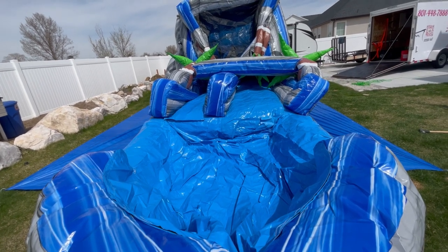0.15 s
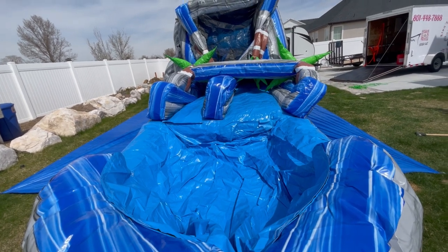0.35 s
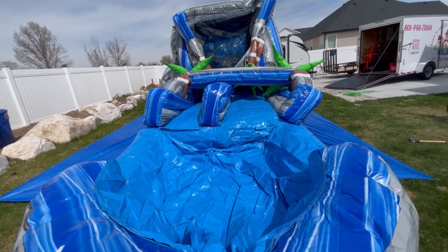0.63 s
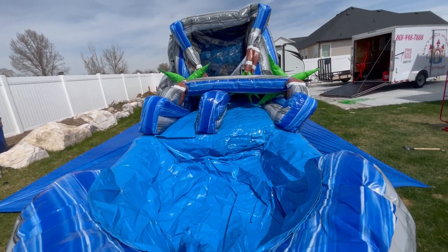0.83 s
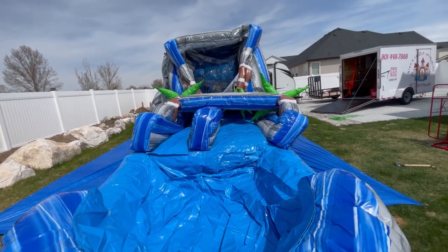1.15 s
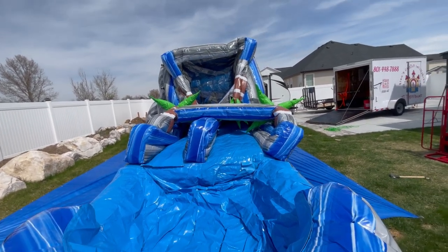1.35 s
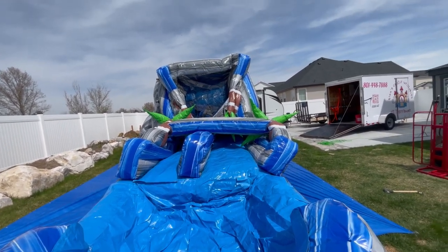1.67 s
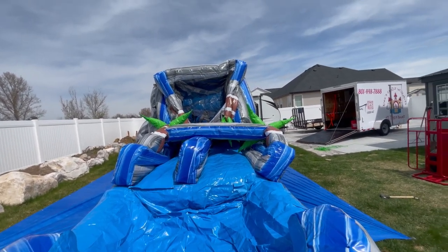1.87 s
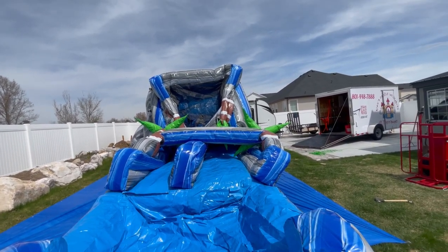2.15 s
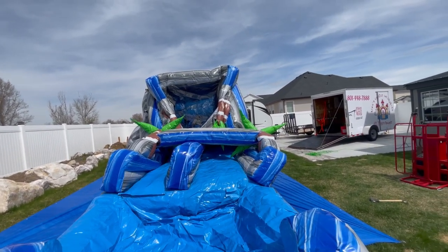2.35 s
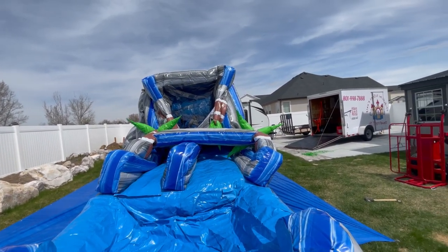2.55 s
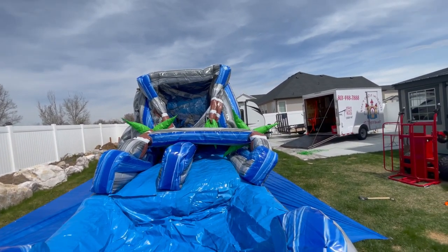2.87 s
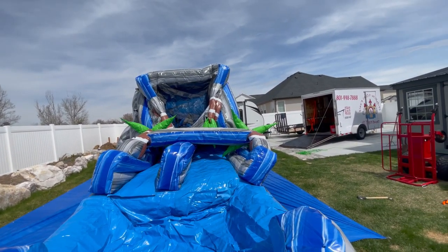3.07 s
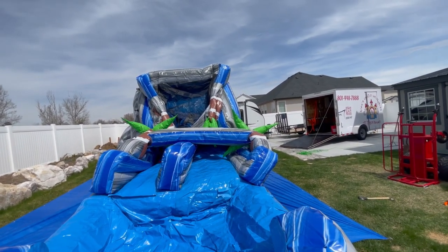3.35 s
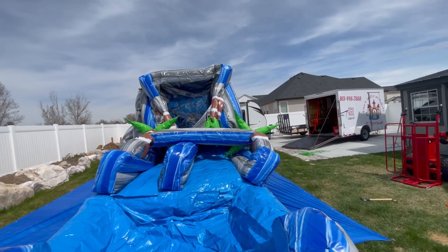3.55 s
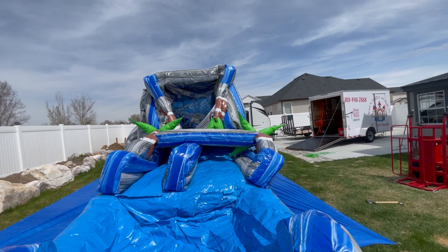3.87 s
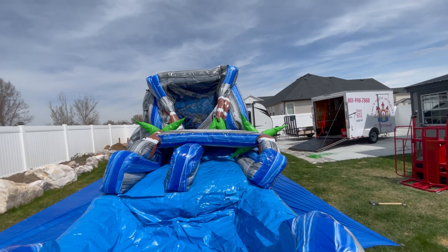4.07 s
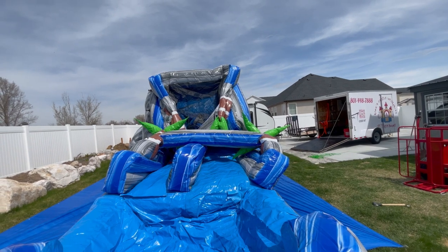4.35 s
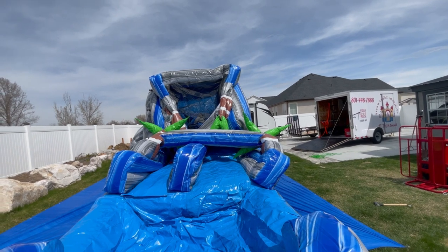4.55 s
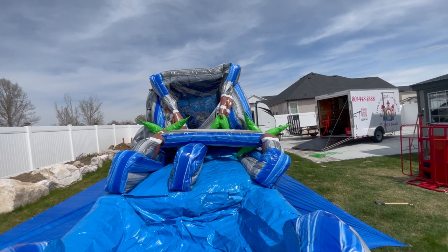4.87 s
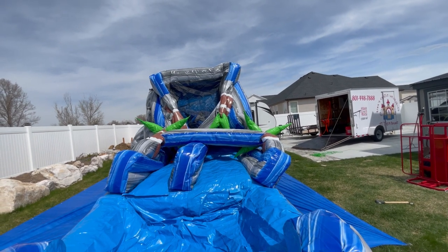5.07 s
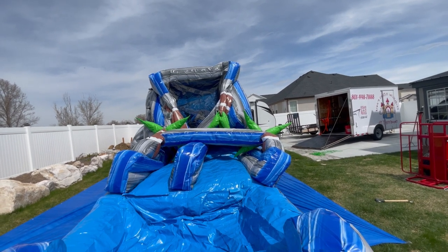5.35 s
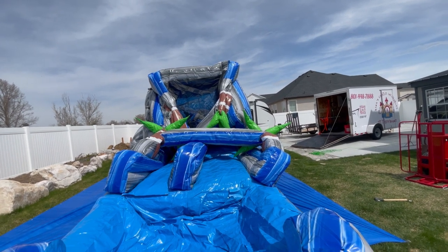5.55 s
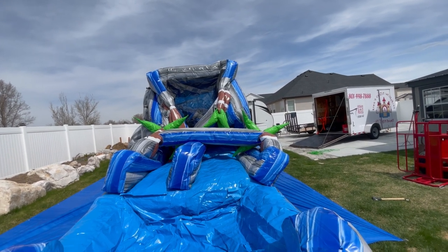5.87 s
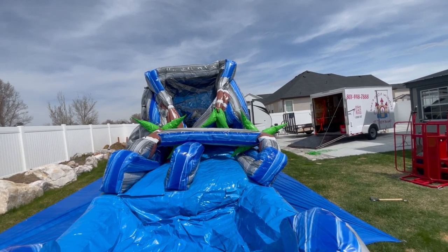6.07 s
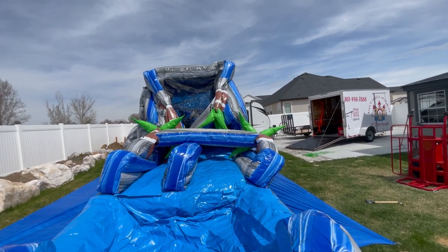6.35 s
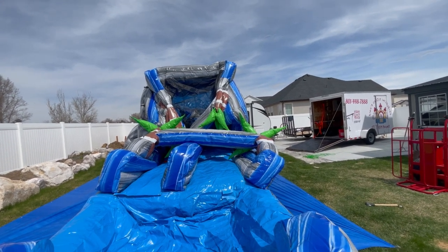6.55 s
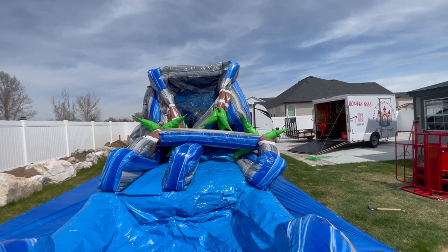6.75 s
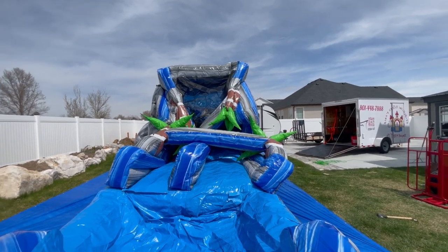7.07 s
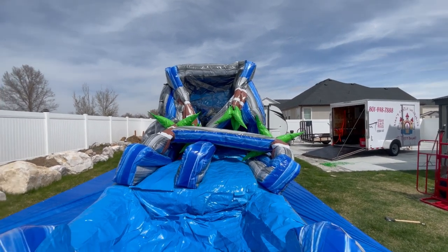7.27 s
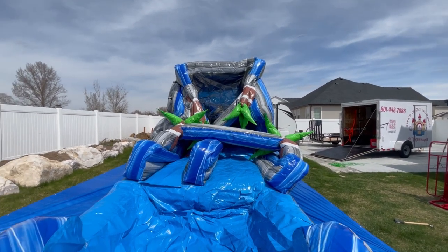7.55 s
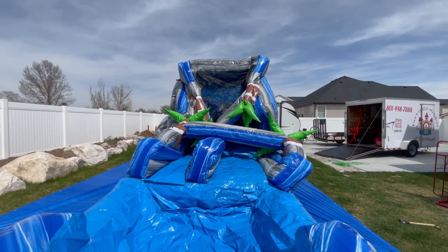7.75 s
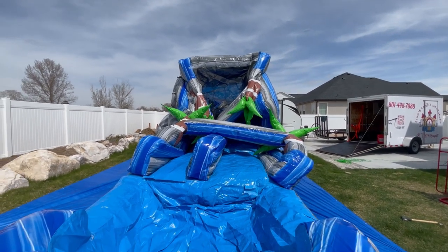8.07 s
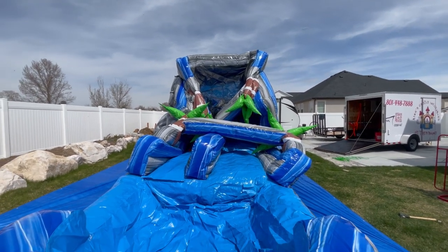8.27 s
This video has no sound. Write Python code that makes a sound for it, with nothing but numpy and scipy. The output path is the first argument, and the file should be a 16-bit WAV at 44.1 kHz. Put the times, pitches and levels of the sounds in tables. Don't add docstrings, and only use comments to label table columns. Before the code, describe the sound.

Open lawn, handheld stereo microphone near a large inflatable. A far hand tool spins up and bites, then cuts off, leaving the blower's continuous whine, rumbling air and thin hiss. The whine grows stronger on the left as the microphone moves. A short gust buffets it soon after two seconds, two low knocks follow, then a weaker gust around five; tiny vinyl crackles continue throughout.

```python
import sys
import numpy as np
from scipy import signal
from scipy.fft import rfft, irfft, next_fast_len
from scipy.io import wavfile
from scipy.ndimage import uniform_filter1d, map_coordinates

SR = 44100
rng = np.random.default_rng(int(sys.argv[2]) if len(sys.argv) > 2 else 0)


def unload_wav(signal):
    wavfile.write(
        sys.argv[1],
        SR,
        np.round(np.clip(np.atleast_2d(signal).T, -1, 1) * 32767).astype(np.int16),
    )


def linear_from_db(decibels):
    return 10 ** (np.asarray(decibels, float) / 20)


N = 370733


def curves(rows):
    seconds, *columns = np.transpose(rows)
    return [np.interp(np.arange(N) / SR, seconds, column) for column in columns]


def wobble(rate):
    knots = rng.standard_normal(int(N * rate / SR) + 4)
    return map_coordinates(knots, [np.arange(N) * rate / SR])


def filtered(x, response):
    m = next_fast_len(N + SR // 4)
    return irfft(rfft(x, m) * response(np.fft.rfftfreq(m, 1 / SR)), m)[..., :N]


def turns(hz):
    return 2 * np.pi * np.cumsum(hz) / SR


def rush(table, below_db, above_db, patchy_db):
    z = signal.stft(rng.standard_normal((3, N)), nperseg=512)[2]
    field = uniform_filter1d(rng.standard_normal(z.shape[1:]), size=8, axis=0)
    field = uniform_filter1d(field, size=10, axis=1)
    noise = signal.istft(z * linear_from_db(patchy_db * field / field.std()), nperseg=512)[1][:, :N]
    f, left, right, alike, lead = np.transpose(table)

    def response(hz):
        def read(column):
            return np.interp(np.log(hz + 1), np.log(f + 1), column)

        octaves = np.log2((hz + 1) / f[[0, -1], None])
        skirts = below_db * np.minimum(octaves[0], 0) - above_db * np.maximum(octaves[1], 0)
        gain = linear_from_db(np.array([read(left), read(right)]) + skirts) * np.sqrt(SR / 2)
        share = np.clip(read(alike), 0, 1)
        shift = np.exp(.5j * read(lead) * np.array([[1], [-1]]))
        return np.array([gain * np.sqrt(share) * shift, gain * np.sqrt(1 - share)])

    common, own = filtered(np.array([noise[[0, 0]], noise[1:]]), response)
    return common + own


def whine():
    # time in seconds, left level in dB, right level in dB.
    walk = [(0, -59, -48), (.6, -54, -44), (1.0, -47.5, -42.5), (1.25, -39, -42.5), (1.6, -35, -37.5),
            (2.6, -35.5, -42.5), (3.0, -36, -50), (3.6, -35.5, -54), (4.2, -35, -48.5), (4.8, -33.5, -52),
            (5.4, -32.5, -57), (5.9, -33.5, -55), (6.55, -40.5, -49), (6.85, -40, -44), (7.2, -37.5, -41.5),
            (7.45, -37.5, -44.5), (8.41, -38, -46.5)]
    blade_hz, creep_hz, creep_mid_s, creep_s = 629.3, 3.65, 4.0, 1.05
    lead_start_rad, lead_rad_per_s = -1.63, .48
    t = np.arange(N) / SR
    hz = blade_hz + creep_hz / (1 + np.exp((creep_mid_s - t) / creep_s))
    lead = lead_start_rad + lead_rad_per_s * t + 0.25 * wobble(4)
    phase = turns(hz) + 0.2 * wobble(12) + np.array([lead, -lead]) / 2
    flutter_db = .5 * np.array([wobble(8), wobble(7.4)])
    flutter_db = flutter_db + 0.57 * np.array([wobble(4.02), wobble(4)])
    tone = linear_from_db(np.array(curves(walk)) + flutter_db) * np.sin(phase)
    octave = linear_from_db(-65.5 + 4 * np.array([wobble(1.36), wobble(1.1)])) * np.sin(2 * phase)
    return np.sqrt(2) * (tone + octave)


def air():
    # frequency in Hz, left level and right level in dB per Hz,
    # likeness of the ports from 0 to 1, left lead in radians.
    roar_colour = [(50, -62.5, -66, 0.93, -0.0), (110, -62, -61.5, 0.94, 0),
                   (160, -61.5, -64.5, 0.93, 0.48), (217, -63, -67, 0.84, 0.1),
                   (301, -67, -67.0, 0.71, -0.7), (390, -69.5, -69.5, 0.77, -0.5),
                   (527, -72.5, -74.5, 0.16, -1.6), (583, -76, -73.5, 0.18, -2),
                   (800, -72.5, -73.5, 0.49, 0.46), (996, -76, -76.5, 0.41, 0.06),
                   (1313, -80.5, -79, 0.12, 1.65), (1705, -84, -82.5, 0.24, 3.5),
                   (2190, -91.5, -87, 0.06, 7)]
    hiss_colour = [(2220, -90.5, -87.5, 0.21, 1.4), (2800, -87.5, -86.5, 0.59, 0.56),
                   (3320, -91, -91, 0.35, 2.1), (3980, -93, -94, 0.03, 1.3), (5000, -89, -97.5, 0.28, 3.5),
                   (6000, -89.5, -99.4, 0.18, 6), (6950, -94.5, -101.7, 0.31, 6.5),
                   (7800, -98, -101.6, 0.12, 7.4), (8640, -100.0, -100.3, 0.32, 5.9),
                   (9600, -99.0, -99.0, 0.69, 3.7), (9960, -101.5, -101, 0.93, 2.74),
                   (10870, -95, -96, 0.86, 2.7), (11530, -102.5, -103.1, 0.8, 0.3),
                   (11850, -110, -110, 0.97, 0.1)]
    roar_surge = linear_from_db(0.27 * wobble(0.92) + 0.52 * wobble(3.054))
    roar = roar_surge * rush(roar_colour, below_db=5, above_db=58, patchy_db=1.01)
    hiss_surge = linear_from_db(-0.36 + 0.9 * wobble(3.4) + 0.17 * wobble(14))
    hiss = hiss_surge * rush(hiss_colour, below_db=60, above_db=200, patchy_db=1.0)
    return roar + hiss


def throb():
    # multiple of the beat rate, rms level in dB.
    harmonics = [(1, -47), (2, -50), (3, -50), (4, -52), (5, -60.5)]
    beat_hz, lead_rad = 53.57, 0.67
    phase = turns(beat_hz * (1 + 0.0196 * wobble(6)))
    beat = 0
    for k, db in harmonics:
        lead = lead_rad / k * np.array([[.5], [-.5]])
        beat = beat + linear_from_db(db + 2.7 * wobble(5)) * np.sin(k * phase + k * k + lead)
    return np.sqrt(2) * beat * linear_from_db([[1.2], [-1.2]])


def tool():
    # multiple of the shaft rate, level in dB.
    shaft_orders = [(1, 12), (2, 6), (3, 3), (4, 4.5), (5, -4), (6, 4), (8, -8), (9, -11)]
    # centre in Hz, width in Hz, level in dB.
    rasp_bands = [(1210, 85, 6), (1420, 140, 0.5), (3020, 350, -9.5)]
    top_hz, climb_hz, spinup_s = 354, 86, .4
    bite_s, bite_rise_s, stop_s, stop_db_per_s = 0.57, 0.23, 1.2, 400
    tool_db, bite_adds_db, rasp_db, rasp_idle_db = -71, 8, -50, -20
    t = np.arange(N) / SR
    hz = top_hz - climb_hz * np.exp(-t / spinup_s)
    bite = np.clip((t - bite_s) / bite_rise_s, 0, 1)
    phase = turns(hz * (1 + .002 * wobble(24.7)))
    orders = 0
    for k, db in shaft_orders:
        level = linear_from_db(db + 3.2 * np.array([wobble(9.1), wobble(8.86)]))
        orders = orders + level * np.sin(k * phase + rng.normal(0, 0.48, (2, 1)))

    def body(f):
        return sum(linear_from_db(db) * np.exp(-((f - centre) / width) ** 2) for centre, width, db in rasp_bands)

    rasp = filtered(rng.standard_normal((2, N)), body)
    rasp = rasp / rasp.std() * linear_from_db([[2.5], [-2.5]] + 2.7 * wobble(35))
    sound = np.sqrt(2) * linear_from_db(tool_db + bite_adds_db * bite) * orders
    sound = sound + linear_from_db(rasp_db + rasp_idle_db * (1 - bite)) * rasp
    return sound * linear_from_db(-stop_db_per_s * np.maximum(t - stop_s, 0))


def drags():
    # middle in seconds, half length in seconds, level in dB.
    folds = [
        (1.25, 0.16, -53),
        (2.3, 0.33, -57),
        (3.8, 0.46, -53.5),
        (6.95, 0.25, -56.5),
        (8.2, .15, -61),
    ]
    # frequency in Hz, left level in dB, right level in dB,
    # likeness of the ports from 0 to 1, left lead in radians.
    vinyl_colour = [(1200, -5, -3, 0.2, 0), (2200, 2, 1, 0.65, 0), (3500, -6, -8, .2, 0),
                    (6960, -7, -22, .2, 0)]
    t = np.arange(N) / SR
    swell = sum(linear_from_db(db) * np.exp(-((t - middle) / half) ** 2) for middle, half, db in folds)
    rustle = rush(vinyl_colour, below_db=18, above_db=24, patchy_db=1.5)
    return swell * linear_from_db(1.5 * wobble(18)) * rustle / rustle.std()


def crackle():
    # start in seconds, peak level in dB.
    snaps = [(0.2124, -51), (0.3601, -50), (0.9348, -50), (0.9996, -50), (1.3044, -48), (1.4272, -48),
             (2.0512, -44), (2.2882, -43.5), (2.3725, -49), (2.5067, -49), (2.586, -50), (2.8474, -47),
             (3.6296, -53), (3.7259, -51), (4.0946, -45.5), (4.2128, -47), (4.9533, -43.5), (5.3567, -43.5),
             (5.7506, -46), (6.918, -54), (7.3533, -48.5), (7.9543, -45)]
    # frequency in Hz, gain in dB.
    snap_colour = [(600, -22), (1500, -2), (3000, 0.5), (6000, -0.5), (9000, -2.5), (12000, -5)]
    out, t = np.zeros((2, N + SR)), np.arange(SR // 20) / SR
    for start, db in snaps:
        pan_db = 1.5 + 5 * rng.standard_normal()
        decay = linear_from_db(db + 6.5 - 60 * t / 0.033)
        burst = decay * np.minimum(t / 0.0018, 1) * rng.standard_normal((2, len(t)))
        out[:, round(start * SR):][:, :len(t)] += linear_from_db([[pan_db / 2], [-pan_db / 2]]) * burst
    sizes = (rng.random(N) < 40 / SR) * linear_from_db(-56.5 + np.minimum(4 * rng.exponential(size=N), 11))
    sprinkle = signal.fftconvolve(sizes, linear_from_db(-60 * t / .012))[:N]
    out[:, :N] += sprinkle * rng.standard_normal((2, N))
    f, gain_db = np.transpose(snap_colour)
    return filtered(out[:, :N], lambda hz: linear_from_db(np.interp(np.log(hz + 1), np.log(f), gain_db)))


def knocks():
    # start in seconds, peak level in dB, pitch in Hz, 60 dB decay time in seconds.
    taps = [
        (.62, -44, 2250, .04),
        (.775, -47, 2500, .03),
        (3.31, -37, 800, .06),
        (3.465, -33, 907, 0.047),
        (4.036, -42, 1520, 0.071),
        (5.44, -52, 2800, .15),
        (5.81, -53, 2800, .1),
        (6.17, -52, 2550, .2),
    ]
    out, t = np.zeros((2, N + SR)), np.arange(SR // 8) / SR
    for start, db, hz, t60 in taps:
        rough = 1 + 1.8 * uniform_filter1d(rng.standard_normal((2, len(t))), size=24)
        ring = linear_from_db(db - 60 * t / t60) * np.minimum(t / 0.0014, 1) * np.sin(2 * np.pi * hz * t)
        out[:, round(start * SR):][:, :len(t)] += ring * rough
    return out[:, :N]


def eddies():
    # start in seconds, peak level in dB, starting frequency in Hz.
    strong = [
        (2.141, -16, 240),
        (2.16, -25, 100),
        (2.38, -25, 160),
        (2.46, -27, 90),
        (2.526, -24, 140),
        (5.06, -36, 140),
        (5.24, -30, 110),
        (5.375, -27, 170),
    ]
    # start in seconds, length in seconds, eddy level in dB.
    gusts = [
        (2.078, .62, -32),
        (4.62, .94, -37),
    ]
    gap_s, usual_hz, cycles, scatter_db = .03, 115, 5.1, 2.5
    out, t = np.zeros(N + SR), np.arange(SR // 5) / SR
    train = []
    for gust_start, length, gust_db in gusts:
        for k in range(int(np.ceil(length / gap_s))):
            late, louder, higher = rng.standard_normal(3)
            start = gust_start + gap_s * (k + 0.418 * late)
            train.append((start, gust_db + scatter_db * louder, usual_hz * np.exp(0.31 * higher)))
    for start, db, hz in [*strong, *train]:
        u = t * hz / cycles
        swing = np.sin(turns(hz * (0.247 + 0.754 * np.exp(-2.2 * u))))
        out[round(start * SR):][:len(t)] -= linear_from_db(db) * 5 * u * np.exp(1 - 5 * u ** 1.2) * swing
    return out[:N] * np.array([[1], [-.45]])


def scene():
    return whine() + air() + throb() + tool() + drags() + crackle() + knocks() + eddies()


def band_limit(x):
    return signal.sosfilt(signal.butter(12, 13170, fs=SR, output="sos"), x)


def record(dry):
    low_cut_hz, mid_top_hz, side_top_hz = 46, 12430, 11700
    dip_hz, dip_wide_hz, dip_db = 10080, 410, 11.5

    def cut(hz):
        dip = linear_from_db(-dip_db * np.exp(-((hz - dip_hz) / dip_wide_hz) ** 4))
        wind_cut = 1 + (low_cut_hz / (hz + 1)) ** 9
        return np.array([dip * (hz < mid_top_hz), hz < side_top_hz]) / wind_cut

    mid, side = filtered(np.array([dry[0] + dry[1], dry[0] - dry[1]]) / 2, cut)
    return band_limit(np.array([mid + side, mid - side]))


dry = scene()
out = record(dry)
unload_wav(out)
```